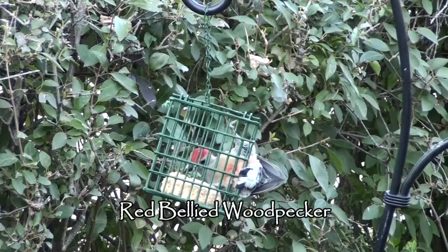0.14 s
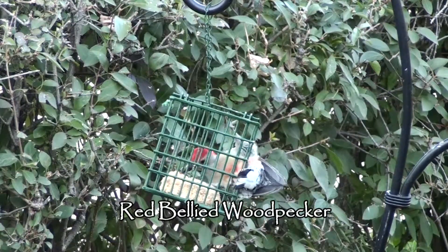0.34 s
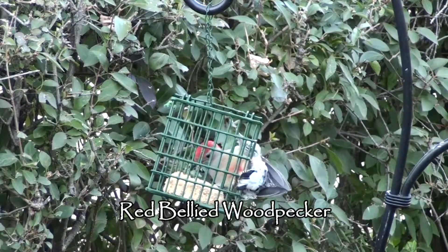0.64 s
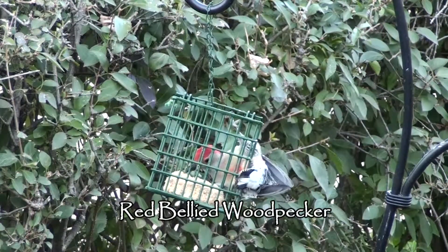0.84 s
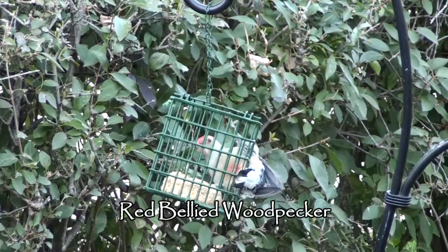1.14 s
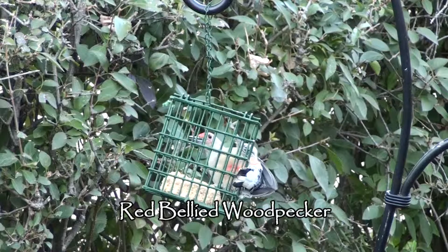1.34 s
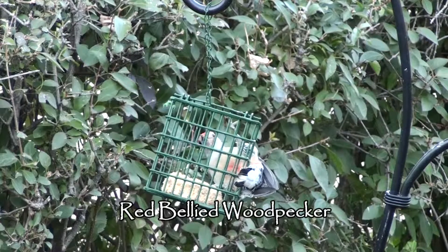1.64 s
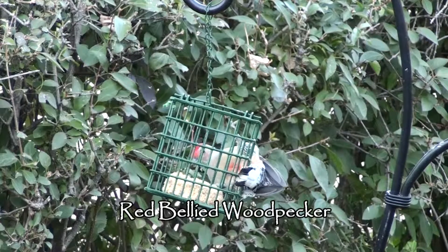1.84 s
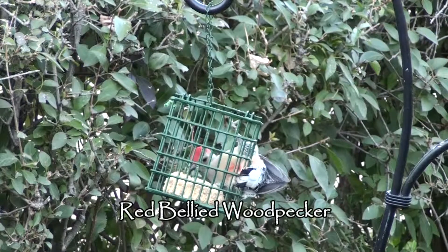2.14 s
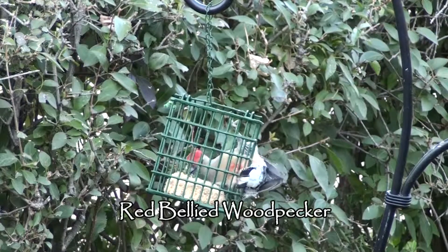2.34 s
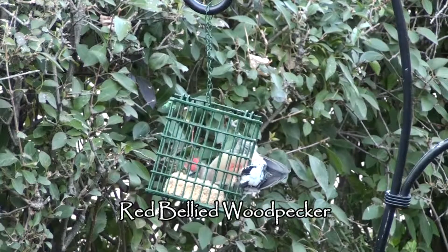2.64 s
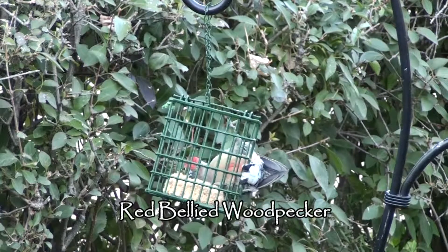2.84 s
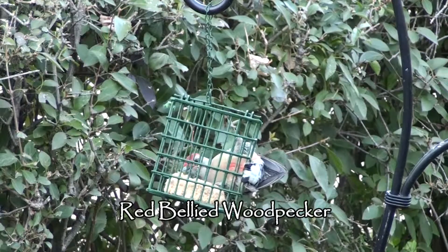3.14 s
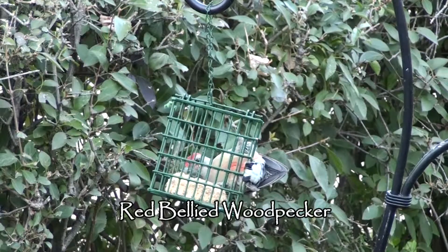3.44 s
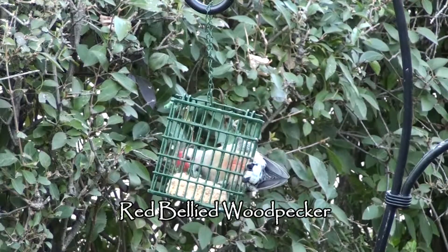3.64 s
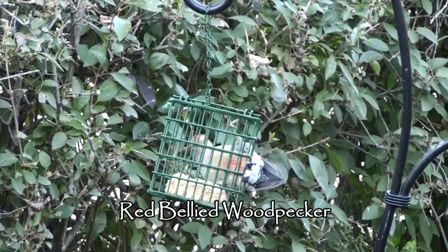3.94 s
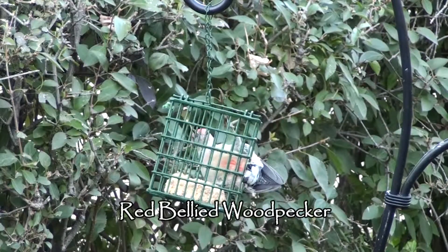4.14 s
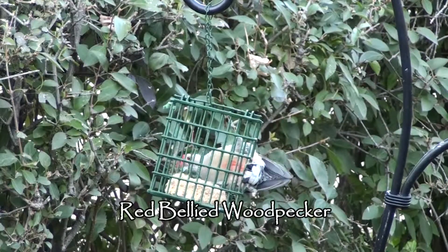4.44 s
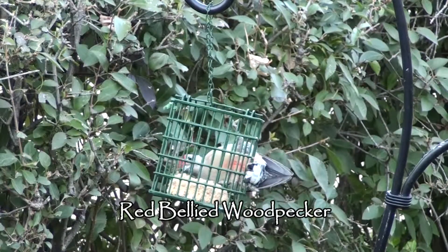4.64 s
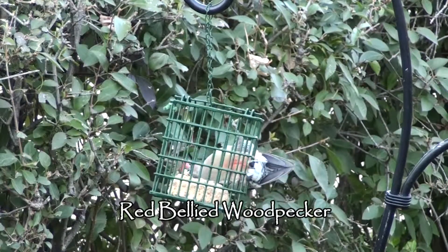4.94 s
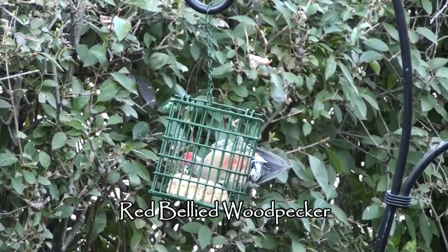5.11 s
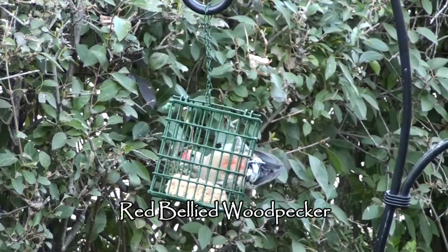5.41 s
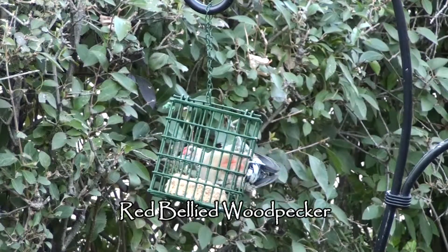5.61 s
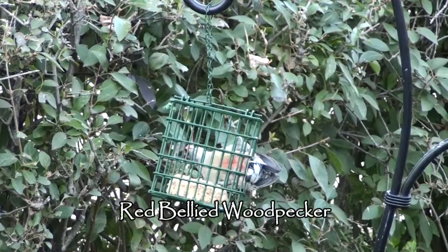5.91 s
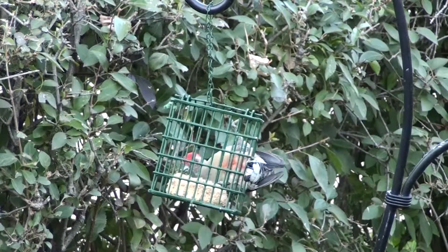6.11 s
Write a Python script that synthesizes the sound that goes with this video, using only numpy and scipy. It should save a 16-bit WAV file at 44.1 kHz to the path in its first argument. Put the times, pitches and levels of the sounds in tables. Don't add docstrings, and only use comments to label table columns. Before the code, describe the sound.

A close woodpecker churrs twice, each a half-second fast rattle of arching mid-pitched notes with a reverberant woodland tail. Between them are low steady air and distant traffic, faint wavering songbird notes sliding down, dry little clucks and light ticks. After the second churr come a short peep, faint climbing whistles, more clucks and a fading, quavering reply from far off, heard through a modest outdoor microphone.

```python
import sys
import numpy as np
from scipy import signal
from scipy.io import wavfile
from scipy.ndimage import uniform_filter1d

SR = 44100
rng = np.random.default_rng(int(sys.argv[2]) if len(sys.argv) > 2 else 0)


def boost(x):
    u = np.asarray(x, float) / 20
    return 10 ** u


def unload_audio(sound):
    columns = np.transpose(np.atleast_2d(sound))
    steps = np.round(np.clip(columns, -1, 1) * 32767)
    wavfile.write(sys.argv[1], SR, steps.astype(np.int16))


N = 276507


def evened(x):
    return x / np.sqrt(np.mean(x ** 2) + 1e-20)


def read(points, hz):
    f, value = np.transpose(points)
    return np.interp(np.log(hz + 1), np.log(f + 1), value)


def add(mix, s, sound):
    part = mix[round(s * SR):][:len(sound)]
    part += sound[:len(part)]


def drift(length, smooth_s):
    size = max(round(smooth_s * SR), 2)
    once = uniform_filter1d(rng.standard_normal(length), size)
    return evened(uniform_filter1d(once, size))


def phase(hz):
    return 2 * np.pi * np.cumsum(hz) / SR


# frequency in Hz, gain in dB.
THROAT = [(900, -14), (1200, -2), (1500, 0), (1700, -2), (1850, -9), (2000, -16), (2450, -32), (2900, -44),
          (3200, -30), (3750, -34), (4300, -52), (5500, -48), (7000, -37), (7600, -44)]


def voice(hz, level_db, count, rough=.45):
    turn = phase(hz)
    fray = 1 - rough + rough * drift(len(hz), .0015)
    fundamental = boost(read(THROAT, hz)) * np.sin(turn)
    overtones = sum(boost(read(THROAT, k * hz)) * np.sin(k * turn) for k in range(2, count + 1))
    return np.sqrt(2) * boost(level_db) * (fundamental + fray * overtones)


STROKE_SHARE = .89
TOP_FIRST, TOP_STROKE, TOP_ARCH = .34, .68, .53


def arches(rows, end_s):
    out = []
    for s, stroke_s, top_hz, dip_db in rows:
        if stroke_s:
            out.append((s, STROKE_SHARE * top_hz, TOP_STROKE, dip_db))
        out.append((s + stroke_s, top_hz, TOP_ARCH if out else TOP_FIRST, dip_db))
    return np.transpose(out + [(end_s, *out[-1][1:])])


LOW_HZ, LOW_SAG_HZ, LOW_DB = 1246, 78, -39
LOW_RELEASE_S, LOW_FALL_DB = .046, 12.5
LOW_CHOKE_DB = 23.5
SLACK_HZ, HELD_HZ, SLACKEN_DB = 1140, 600, 4.
LOW_OVERTONES = [1, -7, -17.5, -27.5, -30, -28]


def low_note(t, start_s, end_s, slack_hz, height):
    hz = LOW_HZ - LOW_SAG_HZ * ((t - start_s) / (end_s - start_s)) ** 2
    turn = phase(hz * (1 + .025 * drift(len(t), .003)))
    choke_db = LOW_CHOKE_DB * (slack_hz - SLACK_HZ) / HELD_HZ
    release_db = LOW_FALL_DB * np.maximum(1 - (end_s - t) / LOW_RELEASE_S, 0)
    swell_db = LOW_DB - choke_db - release_db + 1.9 * drift(len(t), .0041)
    shut_db = -20 * uniform_filter1d(height, size=300) ** 1.5
    fray = .8 + .4 * drift(len(t), .0025)
    low = 0
    for n, db in enumerate(LOW_OVERTONES):
        damped_db = shut_db if n else .5 * shut_db + 3
        low = low + boost(swell_db + db + damped_db) * fray ** min(n, 2) * np.sin((n + 1) * turn)
    return np.sqrt(2) * low


HOLD_DB, TIRE_DB_PER_S, RELEASE_DB_PER_S = -22.5, 1, 202.5


def churr(rows, end_s, release_s):
    s, top_hz, place, dip_db = arches(rows, end_s)
    low_hz = SLACK_HZ + HELD_HZ * np.exp(-dip_db / SLACKEN_DB)
    t = np.arange(s[0], s[-1], 1 / SR)
    step = np.interp(t, s, np.arange(len(s)))
    k, u = step.astype(int), step % 1
    place = place[k]
    rising = u < place
    height = np.sin(np.pi / 2 * np.where(rising, u / place, (1 - u) / (1 - place)))
    base_hz = np.where(rising, low_hz[k], low_hz[k + 1])
    hz = uniform_filter1d(base_hz + (top_hz[k] - base_hz) * height, size=60)
    sag_db = np.where(rising, dip_db[k], dip_db[k + 1]) * (1 - height) ** 2
    release_db = RELEASE_DB_PER_S * np.maximum(t - end_s + release_s, 0)
    level_db = HOLD_DB - TIRE_DB_PER_S * (t - s[0]) - release_db
    effort_db = uniform_filter1d(level_db - sag_db, size=90)
    hz = hz * (1 + .006 * drift(len(t), .001))
    rough_db = (.3 + 6 * (t - s[0])) * drift(len(t), .0015)
    high = voice(hz, effort_db + rough_db, count=6)
    low = low_note(t, s[0], end_s, np.interp(t, s, low_hz), height)
    return s[0], (high + low) * signal.windows.tukey(len(t), .02)


def flick(s, length, from_hz, to_hz, level_db):
    u = np.arange(round(length * SR)) / (length * SR)
    turn = phase(from_hz + (to_hz - from_hz) * u)
    shape = np.sin(np.pi * u) * (1 + .35 * drift(len(u), .001))
    return s, np.sqrt(2) * boost(level_db) * shape * np.sin(turn)


# start in seconds, length in seconds of the
# short stroke before the arch, top pitch in Hz, dip in dB between arches.
CHURRS = [
    [(.232, 0, 1610, 26), (.268, 0, 1480, 5), (.279, .010, 1660, 11), (.322, 0, 1730, 3),
     (.368, .012, 1880, 11), (.412, .016, 1880, 11), (.462, 0, 1960, 12), (.505, 0, 1920, 14),
     (.548, .011, 1860, 20), (.598, 0, 1780, 6), (.627, .013, 1700, 14)],
    [(4.094, 0, 1620, 26), (4.125, 0, 1620, 5), (4.146, 0, 1640, 18), (4.181, .013, 1770, 16),
     (4.227, .010, 1880, 8), (4.278, .015, 1900, 12), (4.326, .011, 2000, 11), (4.378, 0, 1960, 14),
     (4.415, .013, 1880, 22), (4.470, .013, 1800, 10)],
]
# end in seconds, release in seconds.
CHURR_ENDS = [(.65, .08), (4.495, .065)]
# start in seconds, length in seconds, first pitch in Hz,
# last pitch in Hz, level in dB.
FLICKS = [
    (.206, .013, 1250, 1900, -42),
    (.2135, .013, 1300, 2050, -33),
    (.221, .018, 1650, 2300, -38),
    (.212, .028, 850, 1150, -45),
    (4.070, .012, 1300, 2000, -33),
    (4.082, .019, 1300, 2450, -38),
    (4.074, .028, 850, 1100, -43),
]


def woodpecker():
    out = np.zeros(N)
    for rows, end in zip(CHURRS, CHURR_ENDS):
        add(out, *churr(rows, *end))
    for row in FLICKS:
        add(out, *flick(*row))
    return out


def whistle(rows, flutter_db=3.5, roll_hz=20.9):
    s, *columns = np.transpose(rows)
    t = np.arange(s[0], s[-1], 1 / SR)
    hz, level_db, *roll = (np.interp(t, s, c) for c in columns)
    hz = hz * (1 + sum(roll) * np.sin(2 * np.pi * roll_hz * t) + .007 * drift(len(t), .002))
    gain = boost(level_db + flutter_db * drift(len(t), .007)) * signal.windows.tukey(len(t), .1)
    return s[0], np.sqrt(2) * gain * np.sin(phase(hz))


ANSWER_SCOOP, ANSWER_ATTACK_S, ANSWER_START_DB, ANSWER_FADE_DB = .87, .035, -10, -20
ANSWER_ROLL = (0.015, 0.14)
# start in seconds, length in seconds, pitch in Hz, level in dB.
ANSWER = (5.81, .39, 1430, -46)


def far_woodpecker():
    s, length, hz, db = ANSWER
    early, late = ANSWER_ROLL
    rows = [(s, ANSWER_SCOOP * hz, db + ANSWER_START_DB, early),
            (s + ANSWER_ATTACK_S, hz, db, early),
            (s + length / 2, hz, db + ANSWER_FADE_DB / 2, late),
            (s + length, hz, db + ANSWER_FADE_DB, late)]
    return whistle(rows, flutter_db=.5)


SLUR_FROM_HZ, SLUR_KNEE_HZ, SLUR_TO_HZ, SLUR_KNEE, SLUR_SOFT_DB = 2620, 2420, 1750, .68, -16


def slur(s, length, db):
    half_soft_db = db + SLUR_SOFT_DB / 2
    return [(s, SLUR_FROM_HZ, half_soft_db),
            (s + SLUR_KNEE * length / 2, (SLUR_FROM_HZ + SLUR_KNEE_HZ) / 2, db + SLUR_SOFT_DB),
            (s + SLUR_KNEE * length, SLUR_KNEE_HZ, half_soft_db),
            (s + (1 + SLUR_KNEE) / 2 * length, (SLUR_KNEE_HZ + SLUR_TO_HZ) / 2, db),
            (s + length, SLUR_TO_HZ, half_soft_db)]


RISE_ATTACK, RISE_START_DB, RISE_SAG_DB = .32, -5, -3


def rise(s, length, from_hz, to_hz, db):
    t = np.arange(0, length, .005)
    hz = 1 / (1 / from_hz + (1 / to_hz - 1 / from_hz) * t / length)
    level_db = db + np.interp(t, [0, RISE_ATTACK * length, length], [RISE_START_DB, 0, RISE_SAG_DB])
    return np.transpose([s + t, hz, level_db])


# seconds from the start, pitch in Hz, level in dB.
WAVER = [(0, 1800, -27), (.027, 3800, -7), (.05, 3660, 0), (.068, 3570, -4), (.09, 3790, -3),
         (.122, 3570, -8)]
# start in seconds, level in dB.
WAVERS = [
    (.335, -50.5),
    (2.425, -50),
    (3.729, -48),
]
# start in seconds, length in seconds, level in dB.
SLURS = [
    (2.498, .048, -53),
    (3.79, .06, -52),
]
# start in seconds, length in seconds, first pitch in Hz,
# last pitch in Hz, level in dB.
RISES = [
    (4.68, .215, 1980, 2630, -61),
    (4.92, .165, 2870, 3700, -62),
    (5.72, .392, 1650, 3200, -58),
    (6.125, .04, 3300, 3950, -60),
]


def far_songbirds():
    out = np.zeros(N)
    for s, db in WAVERS:
        add(out, *whistle(np.add(WAVER, (s, 0, db))))
    for row in SLURS:
        add(out, *whistle(slur(*row), flutter_db=2.5))
    for row in RISES:
        add(out, *whistle(rise(*row), flutter_db=5.5))
    return out


PEEP_EDGE, PEEP_EDGE_DB, PEEP_DROOP = .27, -8, .87
# start in seconds, length in seconds, pitch in Hz, level in dB.
PEEPS = [
    (0.793, 0.098, 1728, -47.5),
    (4.889, .06, 1805, -48),
]


def bush_peeps():
    out = np.zeros(N)
    for s, length, hz, db in PEEPS:
        edge, soft = PEEP_EDGE * length, (PEEP_DROOP * hz, db + PEEP_EDGE_DB)
        rows = [(s, *soft), (s + edge, hz, db), (s + length - edge, hz, db), (s + length, *soft)]
        add(out, *whistle(rows, flutter_db=1.5))
    return out


def ring(hz, t60, rise_s):
    t = np.arange(round(.03 * SR)) / SR
    shape = (1 - np.exp(-(t / rise_s) ** 2)) * boost(-60 * t / t60)
    return shape / shape.max() * np.sin(2 * np.pi * hz * t)


PULSE_GAP_S, PULSE_SLOWING, CHEST_DB = .0069, .09, -49.5
# start in seconds, peak in dB, number of pulses, fall in dB a pulse.
CLUCKS = [(1.8377, -43, 4, 2), (2.0732, -41, 3, 3), (2.7207, -46, 1, 0), (2.9462, -43, 2, 5),
          (3.1951, -43, 1, 0), (3.46, -48, 1, 0), (4.7755, -42, 1, 0), (5.1048, -37, 2, 6),
          (5.2934, -39, 2, 5), (5.5004, -34, 4, 2.7), (5.7399, -42, 3, 1.5), (5.9524, -37, 1, 0),
          (5.9668, -36, 1, 0)]


def clucks():
    out = np.zeros(N)
    for s, db, count, fall_db in CLUCKS:
        for n in range(count):
            throat, chest = rng.uniform(-1.3, 1, 2)
            at = s + PULSE_GAP_S * n * (1 + PULSE_SLOWING * (n - 1) / 2)
            add(out, at, boost(db - n * fall_db + .5) * ring(1610 * (1 + .03 * throat), .02, .001))
            add(out, at, boost(CHEST_DB) * ring(680 * (1 + .15 * chest), .022, .0015))
    return out


# start in seconds, peak in dB, pitch in Hz.
TICKS = [(1.2648, -50, 4540), (2.8254, -56.5, 3390), (2.9472, -47.5, 2290), (3.1963, -51, 1150),
         (3.4604, -50, 4300), (3.9627, -45, 4210), (5.0486, -51, 3590), (5.5002, -54, 4580)]


def ticks():
    out = np.zeros(N)
    for s, db, hz in TICKS:
        crack = rng.standard_normal(300)
        add(out, s, boost(db) * ring(hz, .0069, .00085))
        dull = signal.lfilter([.4], [1, -.75], crack)
        add(out, s, boost(db + 6) * dull * boost(-60 * np.arange(len(crack)) / SR / .015))
    return out


# delay in seconds, level in dB.
TRUNKS = [(.0027, -12), (.0085, -16), (.014, -15), (.027, -16), (.041, -18)]


def trunk_echoes(near):
    out = near.copy()
    for s, db in TRUNKS:
        add(out, s, boost(db) * near)
    return out


# frequency in Hz, time in seconds to fall by 60 dB.
TREES = [(800, 3.9), (1500, 1.34), (2500, 1.8), (3700, 1.3), (7000, 0.54)]


def trees(x, start_s):
    taps = np.zeros(2 * SR)
    at = np.arange(0, 2 * SR - 20, 20)
    taps[at + rng.integers(0, 20, len(at))] = rng.choice([-1., 1.], len(at))
    hz, t, z = signal.stft(taps, SR, nperseg=256)
    decay = boost(-60 * t / read(TREES, hz)[:, None])
    tail = signal.istft(z * decay, SR, nperseg=256)[1]
    tail = tail * np.minimum(np.arange(len(tail)) / (start_s * SR), 1)
    return signal.fftconvolve(x, tail / np.linalg.norm(tail))[:N]


def noise(points, patchy_db, swell_db):
    frames, hz = N // 256 + 5, np.fft.rfftfreq(1024, 1 / SR)
    a, b, patches = rng.standard_normal((frames, 513, 3)).T
    patches = uniform_filter1d(patches, size=10, axis=0)
    patches = evened(uniform_filter1d(patches, size=12, axis=1))
    swell = drift(frames * 256, .028)[::256]
    z = (a + 1j * b) * boost(read(points, hz)[:, None] + patchy_db * patches + swell_db * swell)
    return evened(signal.istft(z, nperseg=1024, noverlap=768)[1][:N])


# frequency in Hz, level in dB per Hz.
AIR = [(12, -23.5), (20, -12), (96, 0), (136, -4.5), (265, -7.5), (293, -6), (394, -7.5), (436, -8),
       (559, -4.5), (633, -6.5), (753, -4.5), (1300, -2.5), (2480, -13), (7590, -18), (9870, -73.5),
       (16700, -120)]


def air():
    return boost(-55.5) * noise(AIR, patchy_db=1.36, swell_db=.56)


def scene():
    near, far = woodpecker(), far_songbirds()
    add(far, *far_woodpecker())
    small = clucks() + ticks() + bush_peeps()
    near_tail = trees(boost(-17.5) * near + boost(-13) * small, .062)
    far_tail = boost(-2) * trees(far, .022)
    return (trunk_echoes(near) + far + small + near_tail + far_tail + air())[None]


EDGE_HZ = 7740
# frequency in Hz, dB relative to the loudest band,
# dB against the usual air level.
STEPS = [(100, -18, -11), (200, -26, -8), (290, -44, -3), (500, -58, 1), (2200, -58, 3), (2850, -31, 5),
         (3250, -50, 4), (3850, -50, 4), (4150, -33, 5.5), (5300, -39, 5.5), (6500, -47, 5.5),
         (7500, -46, 5.5)]


def narrow_band_recorder(x, hop=1588):
    n, k = np.arange(2 * hop)[:, None], np.arange(int(EDGE_HZ / SR * 2 * hop) // 8 * 8)
    basis = np.sin(np.pi * (n + .5) / (2 * hop)) * np.cos(np.pi / hop * (n + .5 + hop / 2) * (k + .5))
    basis = basis * np.sqrt(2 / hop)
    halves = np.pad(x, (hop, 2 * hop - len(x) % hop)).reshape(-1, hop)
    lines = np.hstack([halves[:-1], halves[1:]]) @ basis
    band_db = 10 * np.log10((lines ** 2).reshape(len(lines), -1, 8).mean(2) + 1e-20)
    band_hz = (k[::8] + 4) * SR / (2 * hop)
    hz, under_db, air_db = np.transpose(STEPS)
    loudest_db = uniform_filter1d(-np.sort(-band_db, axis=1)[:, :5].mean(1) + 3, size=2)
    masked_db = loudest_db[:, None] + np.interp(band_hz, hz, under_db)
    usual_db = np.median(band_db, 0) + np.interp(band_hz, hz, air_db)
    chance = uniform_filter1d(rng.standard_normal(band_db.shape), size=3, axis=0)
    scarce_db = 4 * uniform_filter1d(chance, size=2, axis=1)
    step = np.repeat(boost(np.maximum(masked_db, usual_db) + scarce_db), 8, axis=1)
    rounded = np.sign(lines) * np.floor(abs(lines) / step + .4) * step
    frames = rounded @ basis.T
    return (frames[1:, :hop] + frames[:-1, hop:]).ravel()[:len(x)]


# frequency in Hz, level in dB per Hz.
HISS = [(7600, -62), (7900, -5.5), (9000, 7), (9300, 11.5), (13000, 13), (13400, -13.5), (15500, 6.5),
        (16000, -12)]


def converter_hiss():
    return boost(-97) * noise(HISS, patchy_db=.5, swell_db=1.5)


def band_limit(x):
    return signal.sosfilt(signal.butter(12, 15500, fs=SR, output="sos"), x)


def record(dry):
    heard = narrow_band_recorder(dry[0]) + converter_hiss()
    return band_limit(heard[None])


dry = scene()
out = record(dry)
unload_audio(out)
```